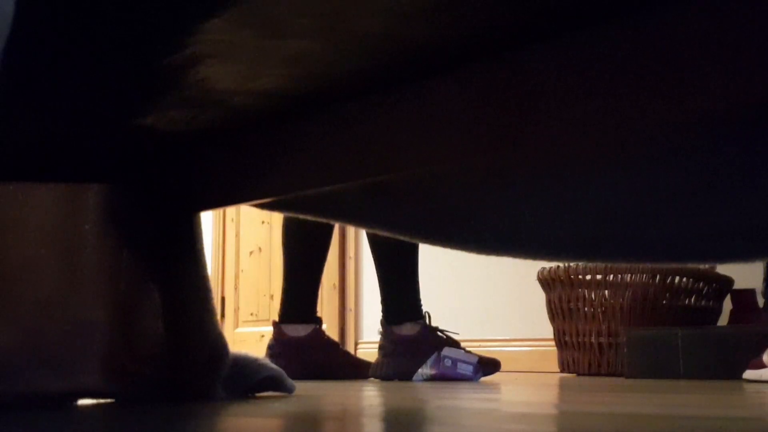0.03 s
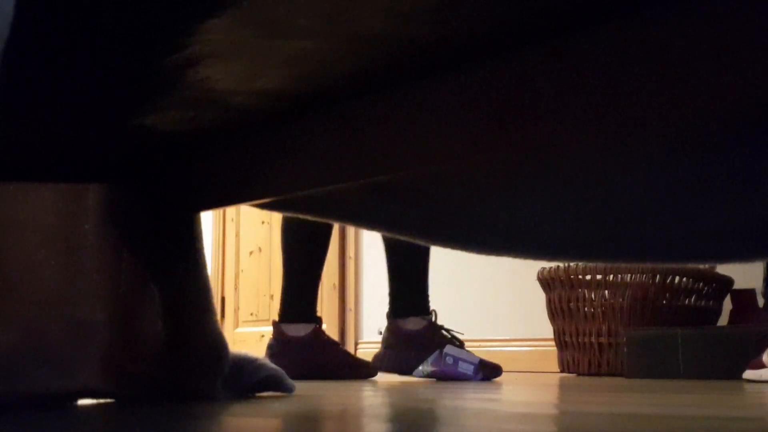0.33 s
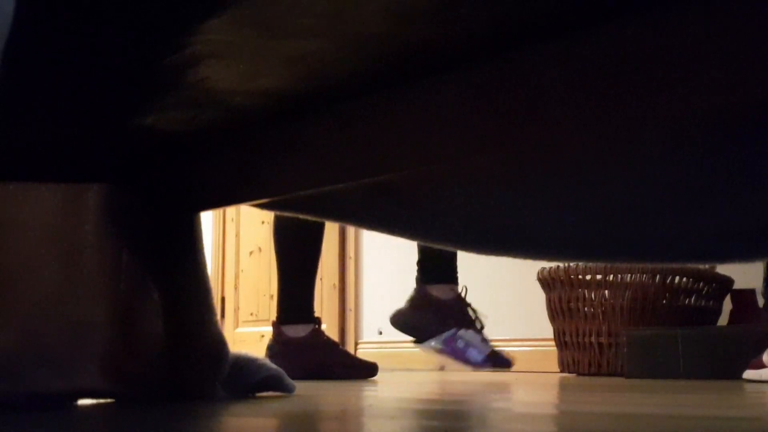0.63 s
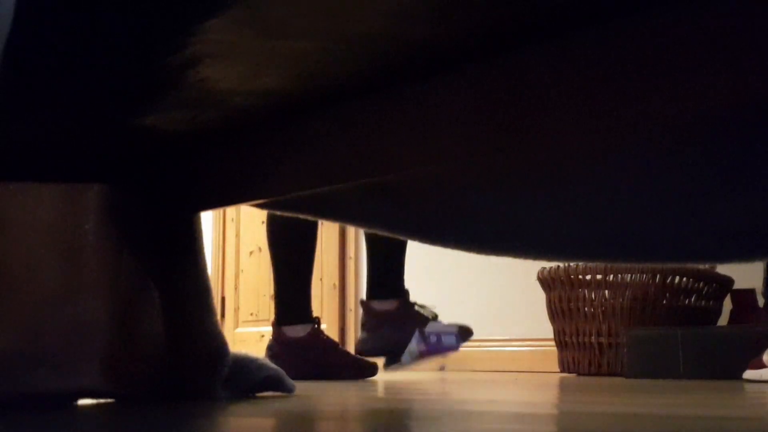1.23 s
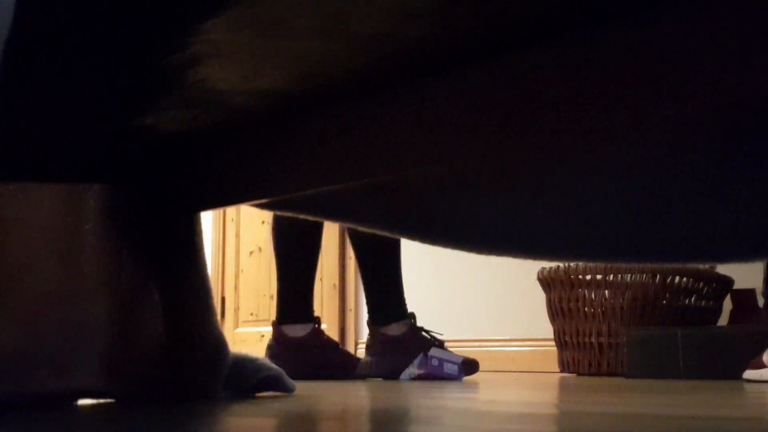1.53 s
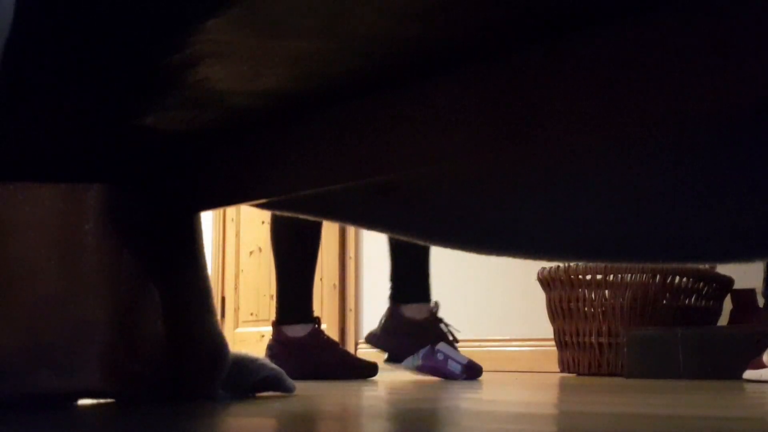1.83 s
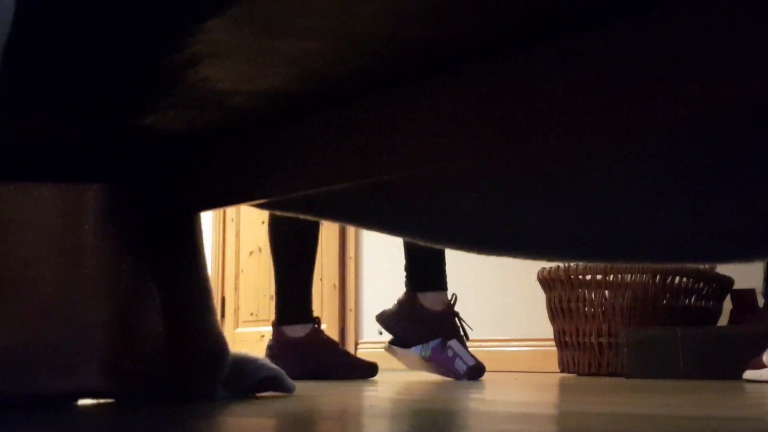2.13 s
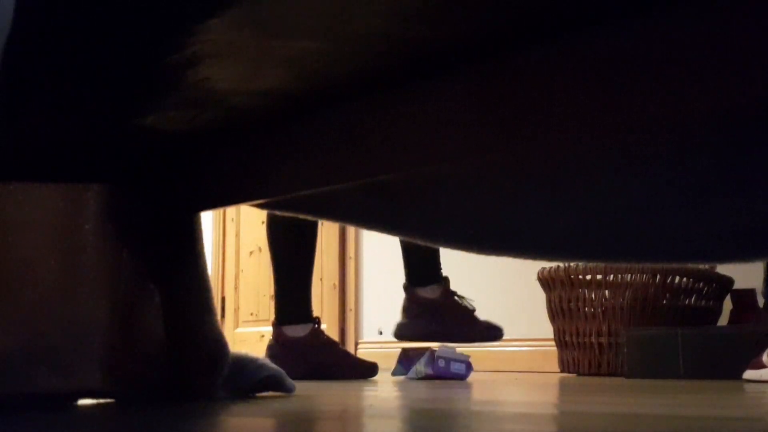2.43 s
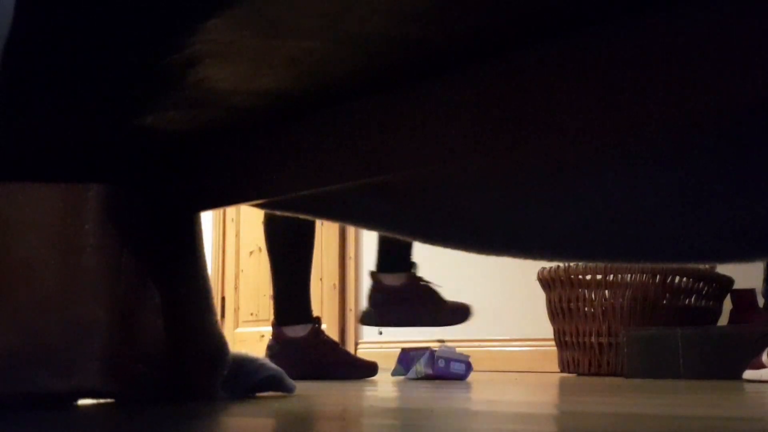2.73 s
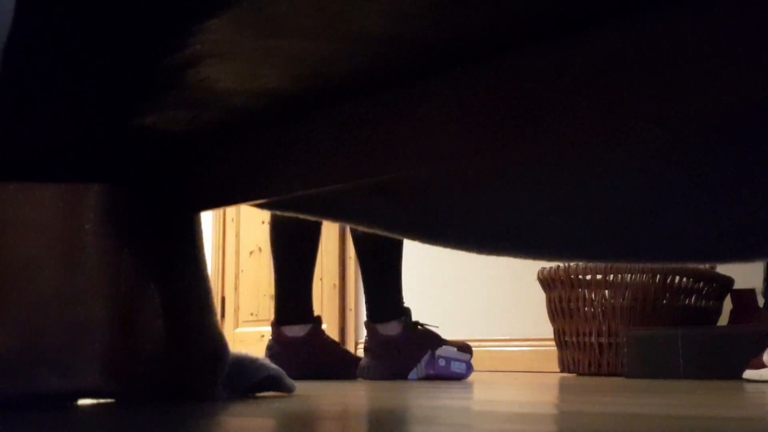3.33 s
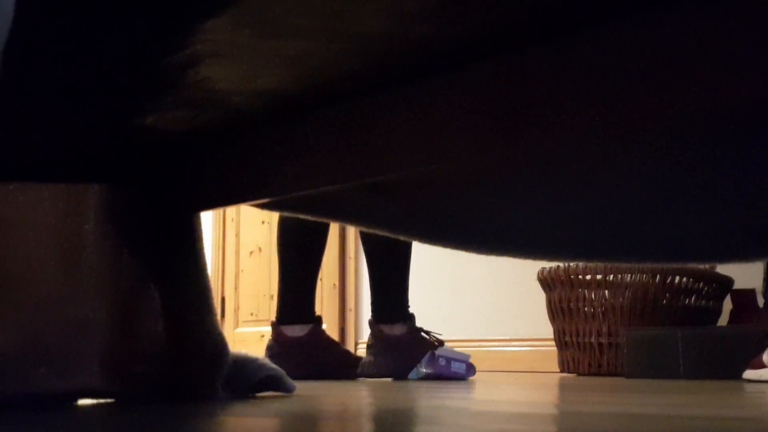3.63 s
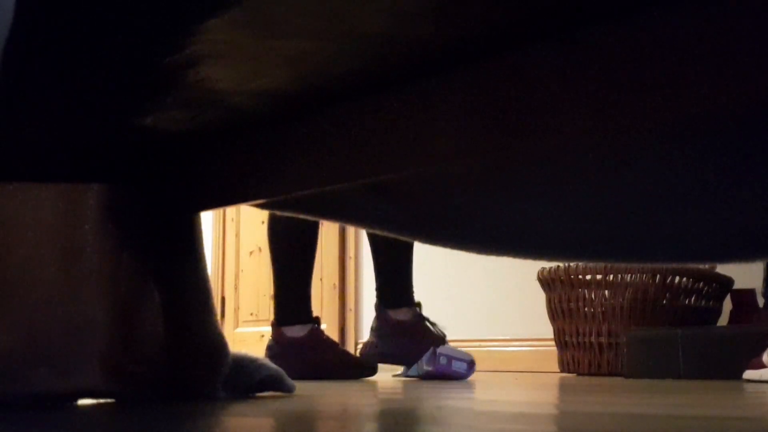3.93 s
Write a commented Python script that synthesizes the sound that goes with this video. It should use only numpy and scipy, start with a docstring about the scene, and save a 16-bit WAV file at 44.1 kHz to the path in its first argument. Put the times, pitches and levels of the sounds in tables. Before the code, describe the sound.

Foot stamping a carton on a wooden floor, then squashing it as air hisses out.

```python
"""Stamping a carton flat

A shoe with a small carton stuck to it stamps on a wooden floor in a bare, ringing room, heard from
under furniture. The boards groan as the weight shifts; the carton knocks, scuffs and drops off. Then
the foot presses it flat: air hisses out through a seam while the card buckles and snaps."""
import sys
import numpy as np
from scipy import signal
from scipy.fft import rfft, irfft, next_fast_len
from scipy.io import wavfile
from scipy.ndimage import map_coordinates

SR = 44100
rng = np.random.default_rng(int(sys.argv[2]) if len(sys.argv) > 2 else 0)


def store_wav(level_fs):
    """Save 16-bit WAV to argv[1]."""
    pcm = np.round(np.clip(np.atleast_2d(level_fs), -1, 1) * 32767)
    wavfile.write(sys.argv[1], SR, pcm.T.astype(np.int16))


N = 176400


def amp(db):
    """Decibels to gain."""
    return 10 ** (np.asarray(db) / 20)


def unit(x):
    """Scale to rms 1."""
    return x / np.sqrt(np.mean(x ** 2) + 1e-20)


def along(points, hz):
    """Read (frequency, value) breakpoints on a log frequency axis."""
    f, v = np.transpose(points)
    return np.interp(np.log(hz + 1), np.log(f + 1), v)


def envelope(points):
    """Read (time, value) breakpoints at every sample."""
    return np.interp(np.arange(N) / SR, *np.transpose(points))


def wobble(rate):
    """Smooth random modulation, rate knots a second."""
    knots = rng.standard_normal(int(N * rate / SR) + 4)
    return map_coordinates(knots, [np.arange(N) * rate / SR])


def filtered(x, response):
    """EQ x with a gain given as a function of frequency."""
    n = x.shape[-1]
    size = next_fast_len(n + SR // 4)
    return irfft(rfft(x, size) * response(np.fft.rfftfreq(size, 1 / SR)), size)[..., :n]


def coloured(x, eq):
    """x through a breakpoint EQ, at rms 1."""
    return unit(filtered(x, lambda hz: amp(along(eq, hz))))


def pulse(db_of_hz, size=4096):
    """A minimum-phase transient with the given spectrum."""
    cepstrum = irfft(np.log(amp(db_of_hz(np.fft.rfftfreq(size, 1 / SR)))))
    cepstrum[1:size // 2] *= 2
    cepstrum[size // 2 + 1:] = 0
    return irfft(np.exp(rfft(cepstrum)))


def add(out, start, x):
    """Mix x into out at start seconds."""
    i = max(0, round(start * SR))
    out[..., i:i + x.shape[-1]] += x[..., :N - i]


# stereo image of the room (frequency [Hz], left-right correlation [-1 to 1])
CORRELATION = [(50, 0.89), (150, 0.79), (280, 0.69), (520, 0.49), (1000, -0.34), (2000, 0.041),
               (4000, -0.01), (12000, -0.16)]


def spread(pair):
    """Turn two unrelated noises into a diffuse stereo field."""
    width = lambda hz: np.arccos(np.clip(along(CORRELATION, hz), -1, 1)) / 2
    mid, side = filtered(pair, lambda hz: np.array([np.cos(width(hz)), np.sin(width(hz))]))
    return np.array([mid + side, mid - side])


# reverb tail of the bare walls (frequency [Hz], T60 [s])
ROOM_DECAY = [(60, 1), (200, .68), (700, 0.59), (2000, 0.61), (4500, 0.55), (9000, 0.41), (14000, 0.41)]
EARLY_DB, EARLY_T60_S = -9, 0.026


def room(x, direct_db):
    """Direct sound, quick reflections off floor and furniture, and the long tail of the walls."""
    hz, t, noise = signal.stft(rng.standard_normal((2, SR)), SR, nperseg=256)
    t60 = along(ROOM_DECAY, hz)[:, None]
    tail = signal.istft(noise * amp(-60 * t / t60) / np.sqrt(t60), SR, nperseg=256)[1][:, :SR]
    t = np.arange(SR) / SR
    early = rng.standard_normal((2, SR)) * amp(EARLY_DB - 60 * t / EARLY_T60_S) / np.sqrt(EARLY_T60_S)
    response = spread(tail + early) * np.sqrt(2 * np.log(1000) / SR)
    response[:, 0] += amp(direct_db)
    return signal.fftconvolve(x[None], response, axes=1)[:, :N]


# EQ of the still room (frequency [Hz], gain [dB])
ROOM_TONE_EQ = [(20, -11.5), (33, -11), (50, 5.5), (60, -6.5), (75, -3.5), (150, 0), (210, -4.5),
                (320, -12.5), (550, -20.5), (1200, -25.5), (1800, -25.5), (2650, -18), (3600, -27),
                (6500, -28), (8500, -30.5), (14500, -26.5)]
ROOM_TONE_DB = -66.5


def room_tone():
    """A faint, low bed of diffuse noise."""
    return amp(ROOM_TONE_DB) * coloured(spread(rng.standard_normal((2, N))), ROOM_TONE_EQ)


# the floor bending as weight shifts (time [s], level [dB], starting pitch [Hz], T60 [s])
GROAN_CUES = [(0.0, -57, 223.3, 0.97), (0.059, -43.5, 218, 0.19), (0.103, -46, 141, 0.17),
              (0.182, -42.5, 205, 0.09), (0.246, -46, 224, 0.19), (.30, -48, 238, 0.23),
              (0.501, -73, 215, 0.47), (0.892, -47.5, 211, 0.48), (0.939, -39, 126, 0.16),
              (0.949, -38, 221, .12), (1.003, -45, 181, 0.13), (1.026, -50, 111, 0.13),
              (1.055, -49, 202.4, 0.22)]
GROAN_END_HZ, GROAN_GLIDE_S, GROAN_ATTACK_S, GROAN_REVERB_DB = 76.8, 0.0867, 0.0073, -9


def floor_groans():
    """Bending waves in the floor arrive high notes first, so each soft push falls in pitch."""
    out, t = np.zeros(N), np.arange(SR // 2) / SR
    for start, db, start_hz, t60 in GROAN_CUES:
        hz = GROAN_END_HZ + (start_hz - GROAN_END_HZ) * np.exp(-(t / GROAN_GLIDE_S) ** 2)
        swell = (1 - np.exp(-t / GROAN_ATTACK_S)) * amp(db - 60 * t / t60)
        add(out, start, swell * np.sin(2 * np.pi * np.cumsum(hz) / SR))
    return amp(GROAN_REVERB_DB) * room(out, direct_db=-GROAN_REVERB_DB)  # direct sound at unity


# sole and carton scuffing (time [s], length [s], rumble [dB], rub [dB], hiss [dB])
SCUFF_CUES = [(0.245, .18, -63, -59, -75.5), (0.412, 0.19, -64.5, -72, -80.5),
              (0.492, 0.09, -81, -77, -75.5), (0.595, 0.21, -67.5, -84, -84.5),
              (0.916, 0.096, -56.5, -68.5, -83), (1.139, 0.2, -68.5, -70, -85),
              (1.655, 0.24, -64.5, -63.5, -76.5), (1.809, 0.047, -76, -62, -99),
              (1.905, .05, -59, -59.5, -78), (1.965, 0.065, -61, -70, -73.5)]
# EQs of the three friction layers (frequency [Hz], gain [dB])
RUMBLE_EQ = [(30, -23), (70, -1), (130, 1.5), (215, 2.5), (300, -10), (600, -36), (2000, -88)]
RUB_EQ = [(100, -15), (250, 9.5), (420, 3.5), (650, 1.5), (850, 0.5), (1200, -12.5), (2500, -27),
          (8000, -37)]
HISS_EQ = [(300, -30), (1500, -5), (4000, -9), (6300, -6.5), (8000, -16.5), (14500, -15)]
SCUFF_ATTACK_SHARE, SCUFF_RELEASE_S, SCUFF_FLUTTER_DB = 0.26, 0.033, 1.53


def scuffs():
    """Uneven strokes of friction: rumble in the boards, rubbing in the carton, a little hiss."""
    out, t = np.zeros(N), np.arange(N) / SR
    layers = np.array([coloured(rng.standard_normal(N), eq) for eq in (RUMBLE_EQ, RUB_EQ, HISS_EQ)])
    for start, length, *levels in SCUFF_CUES:
        attack = np.clip((t - start) / (SCUFF_ATTACK_SHARE * length), 0, 1)
        release = np.clip((start + length - t) / SCUFF_RELEASE_S + .5, 0, 1)
        out += attack * release * (amp(levels) @ layers)
    return room(out * amp(SCUFF_FLUTTER_DB * wobble(60)), direct_db=-3.5)


# short creaks of the sole (time [s], length [s], pitch [Hz], level [dB])
SQUEAK_CUES = [(0.265, 0.068, 6340, -75), (1.174, 0.1, 425.6, -61), (1.182, 0.067, 636, -63),
               (1.752, 0.089, 5120, -73.5), (1.805, 0.045, 806, -61), (1.907, 0.022, 341, -61),
               (1.909, 0.02, 545, -60), (3.353, 0.068, 327.5, -44.5), (3.596, 0.059, 591, -52)]
SQUEAK_WAVER_SHARE, SQUEAK_FLUTTER_DB = .014, 1.3


def squeaks():
    """Rubber sticks and slips on card in brief, wavering tones."""
    out, t = np.zeros(N), np.arange(N) / SR
    for start, length, hz, db in SQUEAK_CUES:
        swell = np.sqrt(np.abs(np.sin(np.pi * np.clip((t - start) / length, 0, 1))))
        gain = amp(db + SQUEAK_FLUTTER_DB * wobble(94))
        pitch = hz * (1 + SQUEAK_WAVER_SHARE * wobble(150))
        out += gain * swell * np.sin(2 * np.pi * np.cumsum(pitch) / SR)
    return room(out, direct_db=-7.5)


# card buckling under the sole (time [s], level [dB])
CRUSH_ENVELOPE = [(3.0, -130), (3.15, -60), (3.2, -53.5), (3.29, -52), (3.34, -44.5), (3.38, -42.5),
                  (3.41, -49), (3.5, -50.5), (3.56, -44), (3.615, -36), (3.66, -57), (3.75, -73),
                  (3.84, -78), (3.91, -59), (4.0, -75)]
# boxy body of the carton (frequency [Hz], gain [dB])
CARTON_EQ = [(35, -35), (100, -6), (170, -8), (230, -2.5), (265, 0.5), (325, -4.5), (440, -10), (590, -3),
             (760, 2.5), (950, -10.5), (1170, -6), (1450, -20.5), (4000, -19), (12000, -33)]
CRUSH_GRAINS_PER_S = 700


def carton_crush():
    """Many small buckles sound the hollow carton."""
    grains = (rng.random(N) < CRUSH_GRAINS_PER_S / SR) * rng.standard_normal(N)
    return room(coloured(grains, CARTON_EQ) * amp(envelope(CRUSH_ENVELOPE)), direct_db=-11.5)


# air escaping from the carton (time [s], level [dB])
AIR_ENVELOPE = [(3.18, -125), (3.215, -52), (3.238, -40), (3.26, -42.5), (3.285, -40), (3.35, -42.5),
                (3.43, -42.5), (3.51, -41), (3.55, -37), (3.595, -28.5), (3.625, -35), (3.65, -41.5),
                (3.69, -39.5), (3.73, -52), (3.8, -72), (3.9, -110)]
# broad hiss of the jet (frequency [Hz], gain [dB])
JET_EQ = [(100, -34), (500, -9.5), (1000, -2), (1400, -5), (1700, -2.5), (2400, -1.5), (3600, 0),
          (5000, -3), (6400, -0.5), (7800, -10), (10500, -6), (14500, -11.5)]
AIR_FLUTTER_DB = 2.5


def air_jet():
    """A fluttering jet through the seam, strongest as the carton collapses."""
    jet = coloured(rng.standard_normal(N), JET_EQ)
    return room(jet * amp(envelope(AIR_ENVELOPE) + AIR_FLUTTER_DB * wobble(120)), direct_db=-7)


# creases snapping over (time [s], level [dB], pitch [Hz], T60 [s], relative crackle level [dB])
SNAP_CUES = [(1.44, -29, 2950, 0.0036, -34), (1.4428, -28, 3430, 0.0063, -39),
             (1.5180, -22.5, 5200, 0.0005, -2), (1.525, -35, 5500, .003, -6),
             (1.5318, -32, 6600, 0.001, -3), (2.3569, -31, 5900, 0.0015, -2),
             (2.360, -36.5, 6400, 0.0026, -2), (2.3653, -38, 4900, 0.0031, -13),
             (2.396, -35.5, 5760, 0.0023, -19), (3.261, -34, 4700, 0.036, -12),
             (3.3925, -19.5, 6060, 0.0024, -7), (3.3956, -22.5, 5600, 0.0018, -14),
             (3.53, -29, 7000, .003, -8), (3.562, -21.5, 5200, 0.0054, -14),
             (3.5957, -26, 3550, 0.0047, -20), (3.5977, -22, 4100, 0.0035, -19),
             (3.61, -26, 3440, .008, -10)]
SNAP_Q, CRACKLE_HZ = 3.8, 12600


def crease_snaps():
    """A crease gives way in a brief burst around the pitch of the panel, with thin crackle on top."""
    def burst(centre, decay):
        bandpass = lambda f: 1j * f * centre / SNAP_Q / (centre ** 2 - f * f + 1j * f * centre / SNAP_Q)
        return unit(filtered(rng.standard_normal(len(decay)) * decay, bandpass))

    out, t = np.zeros((2, N)), np.arange(SR // 25) / SR
    for start, db, hz, t60, crackle_db in SNAP_CUES:
        decay = amp(-60 * t / t60)
        click = burst(hz, decay) + amp(crackle_db) * burst(CRACKLE_HZ, decay)
        gain = amp(db) * np.sqrt(np.mean(decay ** 2))
        add(out, start, room(gain * click, direct_db=-1.5))
    return out


# shoe and carton hitting the floor
# (time [s], contact time [s], deep [dB], bass [dB], body [dB], clack [dB], crack [dB], tick [dB])
STAMP_CUES = [(1.3634, 0.015, -10, 0, 2.5, -27, -28, -45), (1.4131, 0.0077, -1, 7, 9, -7, -12, -32),
              (1.440, 0.0059, 9.5, 16.5, 14.5, 3, -8, -28),
              (1.925, 0.014, -15, -8.5, -10.5, -47, -20.5, -42),
              (2.3095, 0.012, -10, -7, -4.5, -18, -17.5, -38), (2.358, 0.0051, 5, 11.5, 16, 8.5, -6.5, -22),
              (2.3725, 0.0034, 4, 12, 10, 2.5, -8, -38), (2.396, 0.0032, 7.5, 12.5, 2.5, 4.5, -10, -20),
              (2.410, 0.00069, 12.5, 12.5, 5.5, 0.5, -10.5, -40), (2.45, 0.0018, 4, 2.5, 1, -2, -19, -37),
              (3.0708, 0.012, 12, 7.5, 7, -12, -15.5, -27), (3.088, 0.0088, 12.5, 2, -2, -22, -32, -36)]
# those six bands, deep to tick (centre frequency [Hz])
STAMP_BANDS = [105, 210, 780, 1550, 4500, 11000]
# woody colour of the struck floor (frequency [Hz], gain [dB])
FLOOR_EQ = [(30, -33), (65, -16.5), (115, -8), (180, -0.5), (230, 0.5), (285, -4), (340, -1), (440, -3.5),
            (600, 1.5), (800, -3), (950, -5), (1150, -1), (1500, -9.5), (2100, -4), (2900, -11.5),
            (6500, -5), (7800, -16), (14500, -7.5)]
# ringing modes of boards and carton (frequency [Hz], relative level [dB])
BOARD_MODES = [(124, -8), (180, -3.5), (231, 1.5), (334, -4), (520, -1), (630, -4.5), (765, -9.5),
               (1150, -20.5)]
GRIT_DB, HARD_CONTACT_S = -16.5, 0.0055
RING_DB, RING_SCATTER_DB, RING_T60_S = -58.5, 1.5, .5


def stamps():
    """Each hit is a pulse and a gritty settling of the sole, crisper when harder; the boards ring on."""
    out, t = np.zeros((2, N)), np.arange(SR) / SR
    for start, contact_s, *levels in STAMP_CUES:
        hit_eq = list(zip(STAMP_BANDS, levels))
        knock = pulse(lambda hz: along(FLOOR_EQ, hz) + along(hit_eq, hz))
        settle = rng.standard_normal(len(t)) * np.exp(-t / abs(contact_s))
        force = amp(GRIT_DB) * settle / np.linalg.norm(settle)
        force[0] += np.exp(-contact_s / HARD_CONTACT_S)  # shorter contact, cleaner attack
        hit = signal.fftconvolve(knock, force / np.linalg.norm(force))
        add(out, start, room(hit, direct_db=-13.5))
        ring = np.zeros(len(t))
        for hz, db in BOARD_MODES:
            decay = amp(db + rng.normal(0, RING_SCATTER_DB) - 60 * t / RING_T60_S)
            ring += decay * np.sin(2 * np.pi * hz * t)
        add(out, start, amp(RING_DB + np.mean(levels[:2])) * ring)  # the low end drives the ring
    return out


# pan of the whole mix (frequency [Hz], left over right [dB])
PAN = [(50, 3), (130, 1.9), (260, 0), (500, 3), (1000, 2.5), (2000, 5), (4500, 6.5), (8000, 1.5),
       (13000, -0.5)]


def scene():
    """All sources over the room tone, a little to the left."""
    bed = room_tone()
    foley = stamps() + crease_snaps() + floor_groans() + scuffs() + squeaks() + air_jet() + carton_crush()
    return filtered(bed + foley, lambda hz: amp(np.outer([.5, -.5], along(PAN, hz))))


HIGH_CUT_HZ = 14900


def record(dry):
    """A brick-wall high cut on the mix."""
    return filtered(dry, lambda hz: 1 / np.sqrt(1 + (hz / HIGH_CUT_HZ) ** 200))


dry = scene()
out = record(dry)
store_wav(out)
```